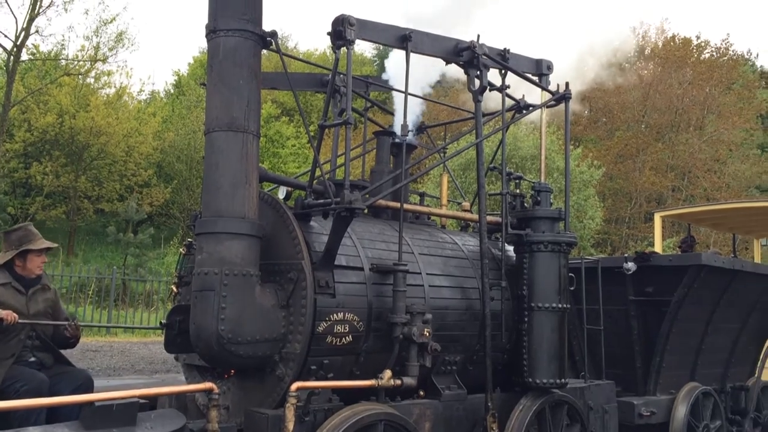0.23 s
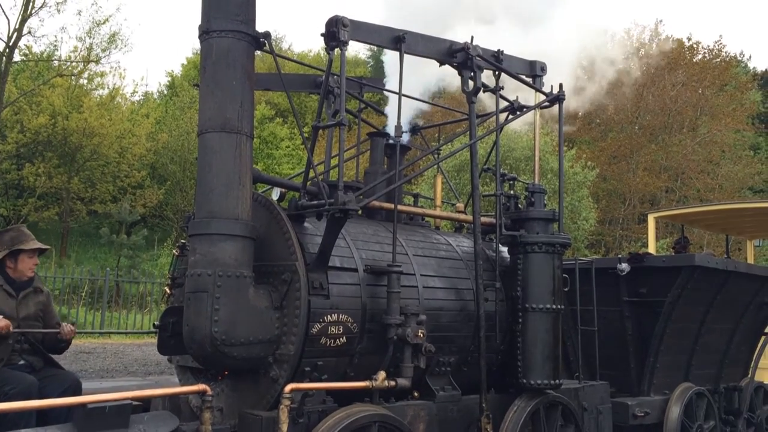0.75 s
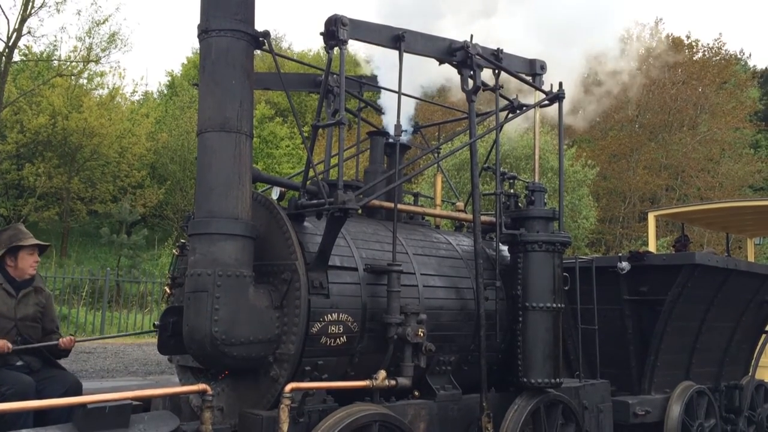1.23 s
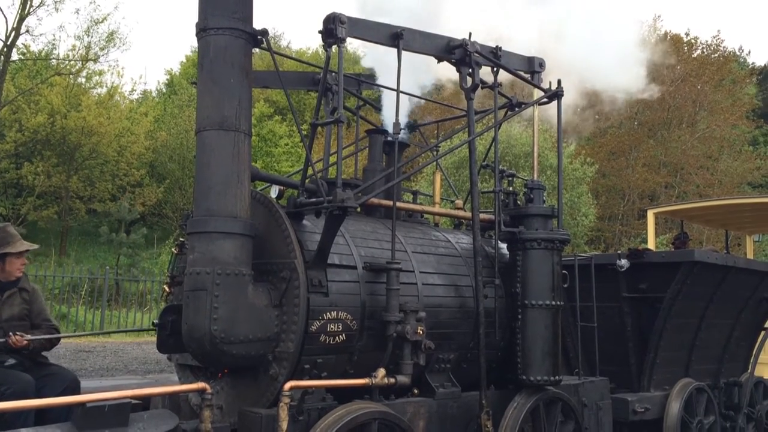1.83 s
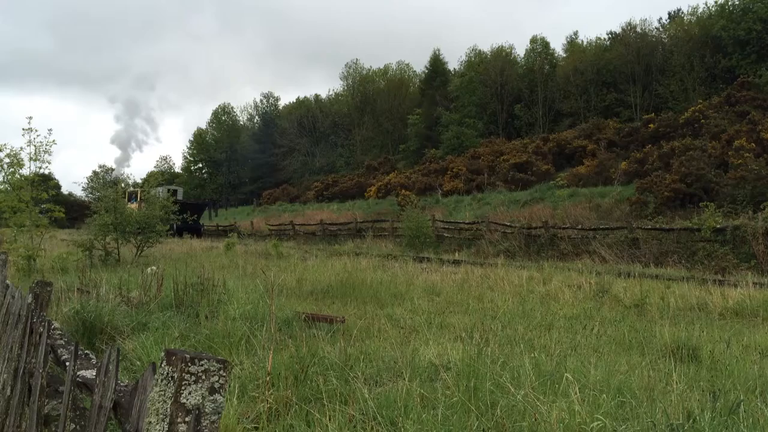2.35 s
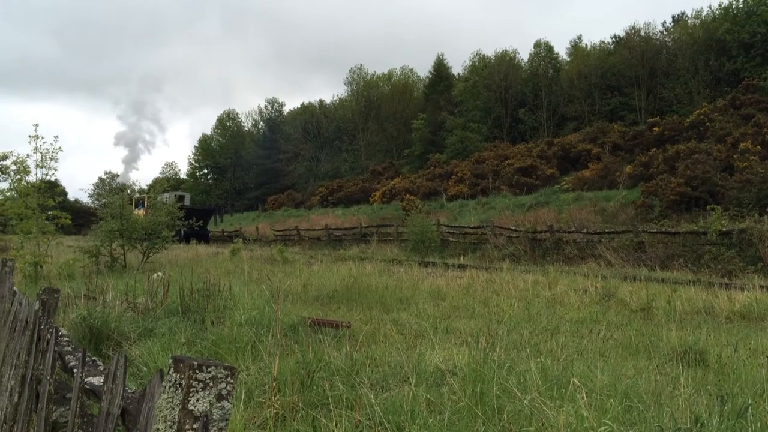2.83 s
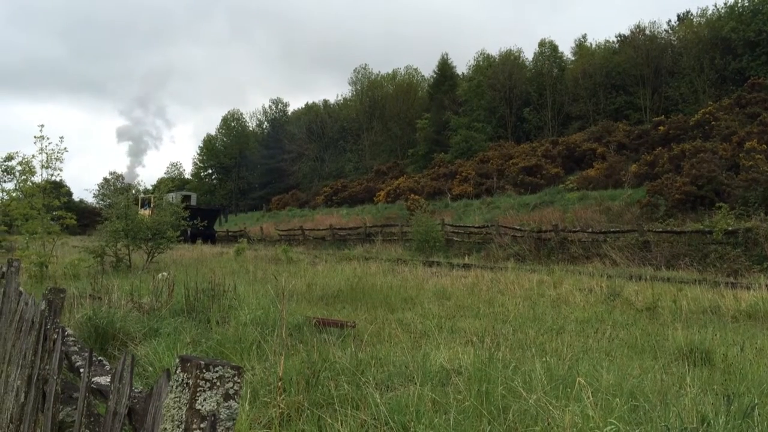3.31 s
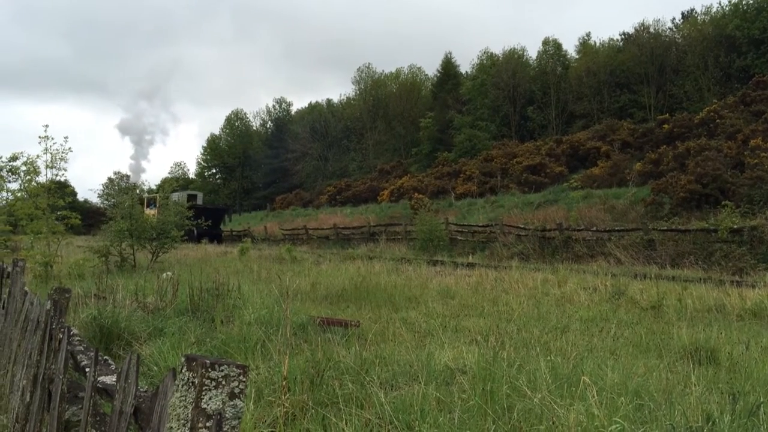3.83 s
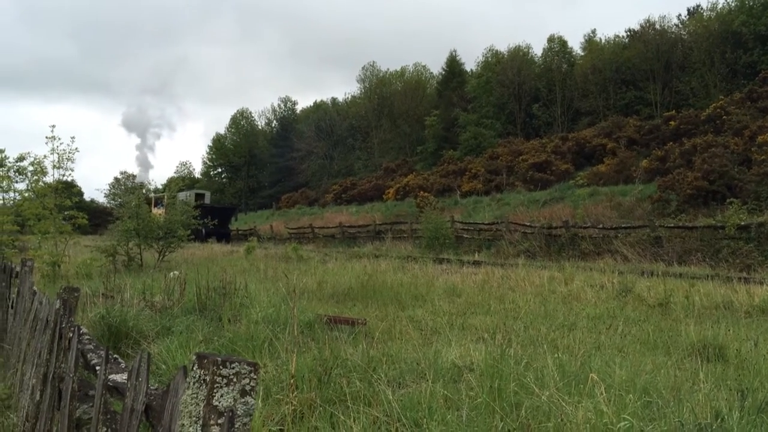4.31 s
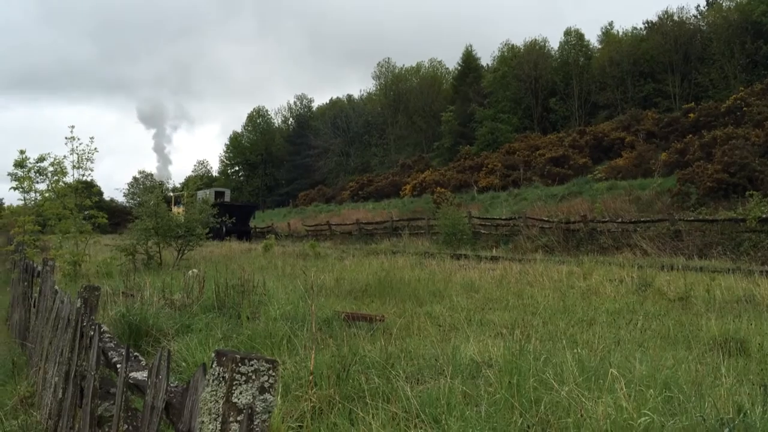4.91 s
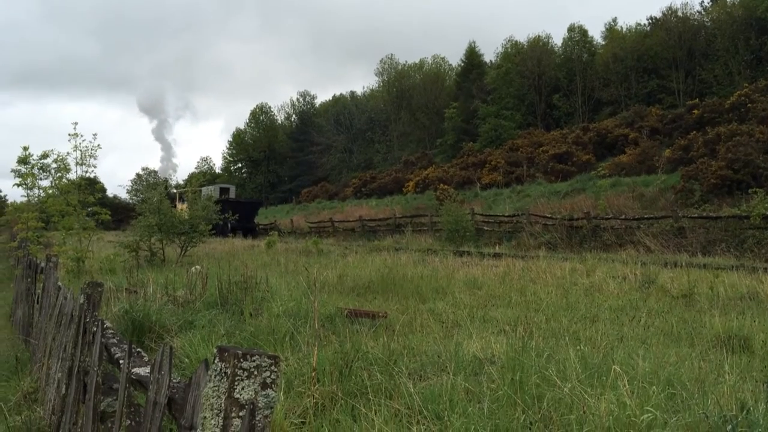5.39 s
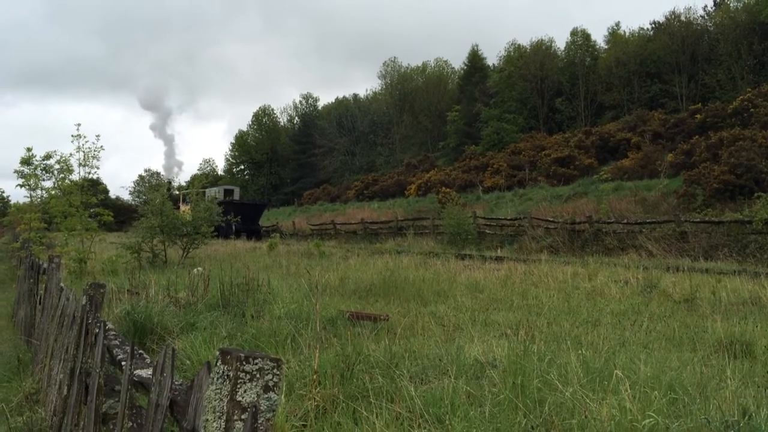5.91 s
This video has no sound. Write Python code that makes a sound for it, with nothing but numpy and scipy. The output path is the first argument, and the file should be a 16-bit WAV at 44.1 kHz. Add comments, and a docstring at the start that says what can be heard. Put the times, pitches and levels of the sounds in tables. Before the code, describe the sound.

From the start, a standing steam locomotive blows off steam close by, a loud, steady roar with a bright hiss on top. A low wavering hum lies beneath it, with soft thuds at about 0.7 and 1.5 seconds. At 1.6 seconds an iron lever lands with one sharp, briefly ringing clank. The steam cuts off at 2.4 seconds.

After an instant of silence, a much quieter meadow begins at 2.5 seconds, with a soft wash of air and a low rumble. Faint songbirds chirp, whistle and buzz until the end, lightly echoed by trees. A distant engine gives slow knocks and hollow puffs at about 2.5, 3 and 4.3 seconds, then twice around 6. A few small dry ticks snap nearby between 3 and 4.4 seconds, and once more near the end. The rumble swells with a light gust just before 6 seconds.

```python
"""First a standing steam locomotive roars and hisses as steam escapes from its safety valve.
Under the steam are a low hum and two soft thuds; then an iron lever lands with one clank.
After a short silence comes an open meadow below a wood, with a wash of air and a low rumble.
Songbirds whistle and the trees echo them, while a distant engine knocks and puffs slowly
and a few dry ticks snap nearby."""
import sys
import numpy as np
from scipy import signal
from scipy.fft import rfft, irfft
from scipy.io import wavfile

SR = 44100
rng = np.random.default_rng(int(sys.argv[2]) if len(sys.argv) > 2 else 0)


def pcm_store(signal):
    """Save signal as 16-bit PCM."""
    levels = np.round(np.clip(np.atleast_2d(signal), -1, 1) * 32767)
    wavfile.write(sys.argv[1], SR, levels.astype(np.int16).T)


N = 271215
TIME, HZ = np.arange(N) / SR, np.fft.rfftfreq(N, 1 / SR)
LOCOMOTIVE_END_S, MEADOW_START_S = 2.424, 2.521  # silence lies between the two

# Strength of the escaping steam: time_s, level_db
STEAM_LEVEL = [(0.0, -39.5), (1.21, -40), (1.22, -40.5), (2.04, -39), (2.41, -41)]
# Tone of the steam jet (a spectrum says how strong each frequency is): frequency_hz, level_db
JET_SPECTRUM = [(25, -34), (55, -5.5), (100, -13), (170, -3.5), (300, 1), (400, -3), (700, -0.5), (860, -8),
                (1200, 0.5), (2100, -7), (2850, -11.5), (3700, -6), (8000, -7), (15500, -6.5)]
# Frequencies that the valve pipe lifts or weakens: centre_hz, width_hz, lift_db
PIPE_RESONANCES = [(239, 86, 4), (342, 40, 2.5), (392, 27, -7), (544, 133, 7), (769, 77, 5),
                   (1007, 160, 9.5), (1274, 55, 3.5), (1504, 71, 2.5), (1755, 70, 6), (1986, 123, 6.5),
                   (2206, 100, 6.5), (2380, 55, -2), (2484, 110, 4), (2760, 38, 3.5), (3556, 80, 1.5),
                   (6880, 1200, 1.6), (12050, 1400, 2)]
# The iron lever chatters as it lands: start_s, level_db
LEVER_HITS = [(1.5963, -24.5), (1.6018, -25), (1.607, -25.5)]
# Tone of the crunch of each hit: frequency_hz, level_db
CRUNCH_SPECTRUM = [(40, -35.5), (100, -16.5), (170, -13.5), (400, -4), (800, -5.5), (1400, 8.5),
                   (2000, -2.5), (2500, -12), (3600, -4), (4400, -13.5), (5600, -11), (7300, -13),
                   (8300, -46), (15000, -46)]
# Ringing tones of the ironwork: pitch_hz, level_db, fade_s (a fade is the time to drop by 60 dB)
IRON_TONES = [(242, -36, .55), (560, -29, .08), (640, -28, .08), (785, -29, .12), (1060, -24, .1),
              (1205, -22.5, .11), (1262, -20, .08), (1385, -29, .08), (1540, -16, .07), (1707, -18.5, .08),
              (1778, -28, .12), (2013, -26, .15), (2805, -37, .36), (3015, -40, .2), (3230, -38, .13),
              (3542, -36, .3), (3736, -33.5, .2), (3994, -39, .23), (4775, -36, .25), (5044, -37, .13),
              (5319, -39, .2), (5626, -32, .18), (5911, -37, .16), (6178, -44, .25), (6770, -37, .1),
              (7130, -41, .15), (7370, -39, .18)]
# Soft low thuds on the locomotive: start_s, pitch_hz, level_db, fade_s
BOILER_THUDS = [(.725, 135.4, -37.5, 0.25), (1.48, 131, -43.5, 0.31)]
# Notes of the nearer birds: start_s, kind, length_s, middle_pitch_hz, level_db
BIRD_NOTES = [(2.575, "held", .073, 2440, -71.5), (2.6, "fall", .06, 5200, -76),
              (2.637, "arch", 0.07, 2970, -59.5), (2.721, "held", 0.063, 2400, -70.5),
              (2.82, "held", 0.11, 2230, -72), (3.065, "swoop", .027, 5100, -74),
              (3.095, "arch", .052, 2994, -51.5), (3.224, "rise", 0.059, 4200, -70),
              (3.31, "fall", .019, 3790, -67), (3.427, "arch", 0.022, 3930, -63),
              (3.437, "fall", 0.023, 4800, -70), (3.467, "swoop", 0.034, 2100, -56),
              (3.528, "held", .06, 2154, -65), (3.574, "buzz", 0.082, 3080, -61),
              (3.603, "fall", 0.032, 4300, -65), (3.679, "held", .045, 3715, -67),
              (3.705, "held", .032, 3050, -60), (3.806, "fall", 0.039, 3600, -65.5),
              (3.954, "fall", .033, 2600, -58.5), (3.971, "swoop", 0.013, 6500, -67),
              (4.047, "buzz", 0.21, 2320, -63.5), (4.087, "buzz", 0.2, 3070, -65),
              (4.235, "fall", .057, 4340, -66.5), (4.247, "lift", .031, 5900, -68),
              (4.312, "fall", .016, 5200, -64), (4.352, "rise", 0.035, 5180, -66.5),
              (4.36, "fall", .044, 4450, -69), (4.528, "lift", 0.021, 3900, -63),
              (4.603, "held", .025, 3200, -62), (4.644, "lift", 0.054, 4330, -64),
              (4.73, "rise", 0.065, 5580, -67.5), (4.835, "swoop", 0.068, 4300, -63.5),
              (4.968, "lift", .11, 5140, -63.5), (5.066, "fall", 0.054, 3600, -66),
              (5.311, "arch", .04, 5880, -68.5), (5.654, "swoop", 0.056, 5300, -70),
              (5.844, "held", 0.16, 2630, -67), (5.89, "held", 0.082, 1514, -69),
              (5.921, "fall", .037, 5500, -68.5), (6.068, "fall", .05, 5170, -69.5)]
# Each kind of note: start_ratio, end_ratio (both times the middle pitch), rasp_hz
NOTE_SHAPES = {"arch": (.86, 0.79, 22), "fall": (1.11, .89, 30), "swoop": (1.26, .78, 35),
               "rise": (.8, 1.16, 40), "lift": (0.96, 1.07, 25), "held": (1.01, 0.98, 16),
               "buzz": (1.02, 0.92, 120)}
# Far birds in the wood: start_s, end_s, pitch_hz, glide_ratio, length_s, notes_per_s, level_db
FAR_BIRDS = [(2.5, 6.0, 2100, .07, .17, 3.6, -76), (2.8, 5.2, 2750, 0.123, .06, 6, -75),
             (2.9, 5.0, 3750, .12, .045, 9, -73.5), (2.7, 5.2, 4400, .2, .03, 6, -78),
             (5.1, 6.15, 6100, .18, .04, 11, -73), (4.0, 6.0, 7500, .06, .08, 9, -82.5)]
# Beats of the distant engine: start_s, knock_db, puff_db
ENGINE_BEATS = [(2.5, -68, -55.5), (3.02, -59, -77), (4.273, -55, -55), (5.985, -57.5, -61),
                (6.052, -50.5, -59)]
# Tone of its knock: frequency_hz, level_db
KNOCK_SPECTRUM = [(150, -5), (500, -7.5), (850, -2), (1040, 4), (1300, -5), (1900, -0.5), (2900, -8),
                  (4200, -17), (8000, -33), (15000, -42)]
# Frequencies that its chimney stack lifts: centre_hz, width_hz, lift_db
STACK_RESONANCES = [(431, 77, 21.5), (608, 115, 21), (760, 98, 10), (1050, 130, 17), (1800, 200, 15)]
# Dry ticks nearby: start_s, level_db, fade_s
DRY_TICKS = [(3.1, -58, .015), (3.342, -49.5, 0.015), (3.52, -53.5, 0.048), (3.538, -53, 0.039),
             (3.591, -59, .02), (4.074, -53, 0.018), (4.332, -55, .008), (6.056, -51.5, 0.061)]
# Tone of a tick: frequency_hz, level_db
TICK_SPECTRUM = [(500, -20), (1500, -1), (2400, 6), (4000, -3), (9000, -12), (15000, -13)]
# Tone of the air over the meadow: frequency_hz, level_db
AIR_SPECTRUM = [(30, 8.5), (250, 2), (550, 0), (1000, -1.5), (1500, -7), (2200, -8.5), (3300, -13),
                (5000, -15.5), (6500, -18), (9000, -21.5), (15500, -24.5)]
# Tone of the low rumble of the open air: frequency_hz, level_db
RUMBLE_SPECTRUM = [(20, -27), (32, -16), (50, 1), (100, -2), (145, -1.5), (200, -5), (245, -22), (330, -40),
                   (1000, -70)]
# Gusts that swell the rumble: peak_s, level_db
WIND_GUSTS = [(3.06, -53), (5.08, -52), (5.91, -46), (6.14, -50)]


def safety_valve(hiss_db=4.0, churn_db=0.83, surge_db=0.5, flutter_db=0.3, split_hz=2800):
    """The jet roars through its pipe, surging and churning, while the fine hiss stays nearly even."""
    jet = colour(JET_SPECTRUM, PIPE_RESONANCES)
    low_share = 1 / (1 + (HZ / split_hz) ** 20)
    roar = noise(jet * np.sqrt(low_share)) * amp(churn_db * drift(25) + surge_db * drift(3.5))
    hiss = noise(jet * np.sqrt(1 - low_share)) * amp(hiss_db + flutter_db * drift(40))
    return (roar + hiss) * amp(np.interp(TIME, *np.transpose(STEAM_LEVEL)))


def lever_clank(crunch_fade_s=0.066, rise_s=0.0047):
    """Quick hits crunch and set the iron ringing: high tones sound at once, low ones build up."""
    hits = sum(amp(db) * pulse(start, 0.00023, crunch_fade_s) for start, db in LEVER_HITS)
    crunch = noise(colour(CRUNCH_SPECTRUM)) * hits
    landing_s = LEVER_HITS[0][0]
    ring = sum(amp(db) * pulse(landing_s, rise_s / (1 + (hz / 2500) ** 2), fade) * sine(hz)
               for hz, db, fade in IRON_TONES)
    return crunch + ring


def boiler(hum_hz=75.5, hum_db=-59.0, waver=0.035, swell_s=0.24):
    """A low wavering hum that swells in and holds, and two soft thuds."""
    swell = np.minimum(TIME / swell_s, 1) ** 2
    hum = amp(hum_db) * swell * sine(hum_hz * (1 + waver * drift(9.0)))
    thuds = sum(amp(db) * pulse(start, 0.02, fade) * sine(hz) for start, hz, db, fade in BOILER_THUDS)
    return hum + thuds


def near_birds(flicker_db=3.0):
    """Nearer birds whistle a few kinds of note; a fast, unsteady pitch makes the buzzes raspy."""
    song, wobble = np.zeros(N), drift(340)
    for start_s, kind, length_s, hz, db in BIRD_NOTES:
        start_ratio, end_ratio, rasp_hz = NOTE_SHAPES[kind]
        at, note = whistle(start_s, length_s, [start_ratio * hz, hz, end_ratio * hz], rasp_hz * wobble)
        song[at] += amp(db) * note
    return song * amp(flicker_db * drift(90))


def far_birds(waver_hz=40.0):
    """Far birds twitter at random, each around its own pitch and with its own length of note."""
    song, wobble_hz = np.zeros(N), waver_hz * drift(300)
    for start_s, end_s, hz, glide, length_s, notes_per_s, db in FAR_BIRDS:
        for wait, *bends in rng.uniform(-1, 1, (40, 4)):
            start_s += (1 + wait / 2) / notes_per_s
            if start_s < end_s - length_s:
                at, note = whistle(start_s, length_s, hz * (1 + glide * np.array(bends)), wobble_hz)
                song[at] += amp(db) * note
    return song


def whistle(start_s, length_s, pitches_hz, wobble_hz, taper=0.38):
    """One bird note gliding through three pitches: gives its sample positions and its sound."""
    at = np.arange(round(start_s * SR), min(round((start_s + length_s) * SR), N))
    arch = np.polyfit([0, 0.5, 1], pitches_hz, 2)
    glide_hz = np.polyval(arch, np.linspace(0, 1, len(at)))
    return at, signal.windows.tukey(len(at), taper) * sine(glide_hz + wobble_hz[at], len(at))


def woods(near, far, early_db=-5.5, late_db=-7.5):
    """Bank and bushes smear each note at once, trunks echo it later. Far birds arrive only as echo."""
    early = echo(amp(early_db) * near + far, rise_s=0.0032, fade_s=0.12)
    late = echo(near + far, rise_s=0.029, fade_s=0.61)
    return near + early + amp(late_db) * late


def far_engine(knock_fade_s=0.21, puff_fade_s=0.75):
    """Each beat is a knock with a slower, hollow puff from the chimney stack."""
    knocks = sum(amp(db) * pulse(start, 0.005, knock_fade_s) for start, db, _ in ENGINE_BEATS)
    puffs = sum(amp(db) * pulse(start, 0.015, puff_fade_s) for start, _, db in ENGINE_BEATS)
    hollow = colour([(200, -22), (450, -1.5), (1100, -6.0), (2500, -19), (8000, -41)], STACK_RESONANCES)
    return knocks * noise(colour(KNOCK_SPECTRUM)) + puffs * noise(hollow)


def ticks():
    """Short dry snaps, as of grass stems."""
    snaps = sum(amp(db) * pulse(start, 0.00017, fade) for start, db, fade in DRY_TICKS)
    return noise(colour(TICK_SPECTRUM)) * snaps


def meadow_air(air_db=-64.5, rumble_db=-57.0, stir=0.086, lump_db=2.2, lump_hz=10.3, gust_s=0.038):
    """A soft wash of air stirs above a lumpy rumble that swells with each gust."""
    air = noise(colour(AIR_SPECTRUM))
    breeze = irfft(rfft(air) / (1 + (HZ / 2500) ** 4), N)  # the same air without its treble
    wash = amp(air_db) * (air + stir * drift(19) * breeze)
    gusts = sum(amp(db) * np.exp(-((TIME - peak_s) / gust_s) ** 2) for peak_s, db in WIND_GUSTS)
    rumble = noise(colour(RUMBLE_SPECTRUM))
    lumps = amp(rumble_db + lump_db * drift(lump_hz))
    return wash + rumble * np.hypot(lumps, gusts)


def echo(sound, rise_s, fade_s):
    """Many tiny reflections blur a sound, keeping about the same energy."""
    tail = rng.standard_normal(N) * pulse(0, rise_s, fade_s)
    return signal.fftconvolve(sound, tail / np.linalg.norm(tail))[:N]


def amp(db):
    """Turns decibels into a gain, the number to multiply a sound by."""
    return 10 ** (np.asarray(db) / 20)


def colour(spectrum, resonances=()):
    """Gain at every frequency: a smooth spectrum with a bump or dip for each resonance."""
    hz, db = np.transpose(spectrum)
    bumps = sum(lift * 0.5 ** ((2 * (HZ - centre) / width) ** 2) for centre, width, lift in resonances)
    return amp(np.interp(np.log(HZ + 1), np.log(hz), db) + bumps)


def noise(gain):
    """Noise shaped by a gain at every frequency, then scaled to a typical size (rms) of 1."""
    shaped = irfft(rfft(rng.standard_normal(N)) * gain, N)
    return shaped / np.sqrt(np.mean(shaped ** 2) + 1e-20)


def drift(rate_hz):
    """A random wander of typical size 1; a higher rate makes it quicker."""
    return noise(np.exp(-(HZ / rate_hz) ** 2))


def pulse(start_s, rise_s, fade_s):
    """A loudness curve that builds up and dies away."""
    level = np.zeros(N)
    sounding = (TIME > start_s) & (TIME < start_s + 2 * fade_s)
    age_s = TIME[sounding] - start_s
    level[sounding] = (1 - np.exp(-age_s / rise_s)) * amp(-60 * age_s / fade_s)
    return level


def sine(hz, samples=N):
    """A pure tone that holds one pitch or follows a pitch curve."""
    cycles = np.cumsum(np.broadcast_to(hz, samples)) / SR
    return np.sin(2 * np.pi * (cycles + rng.random()))


def scene():
    """First the locomotive close by, then the meadow, alike in both channels."""
    locomotive = safety_valve() + boiler() + lever_clank()
    meadow = meadow_air() + far_engine() + woods(near_birds(), far_birds()) + ticks()
    mono = locomotive * (TIME < LOCOMOTIVE_END_S) + meadow * (TIME > MEADOW_START_S)
    return np.array([mono, mono])


def record(dry, cutoff_hz=15480):
    """Cuts away the very highest treble."""
    low_pass = signal.firwin(767, cutoff_hz, window=("kaiser", 8), fs=SR)
    return signal.oaconvolve(dry, low_pass[None], "same")


dry = scene()
out = record(dry)
pcm_store(out)
```